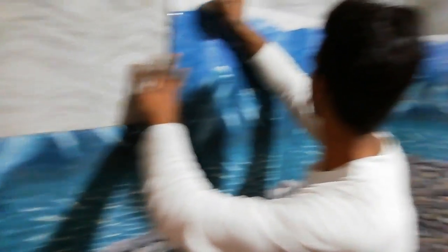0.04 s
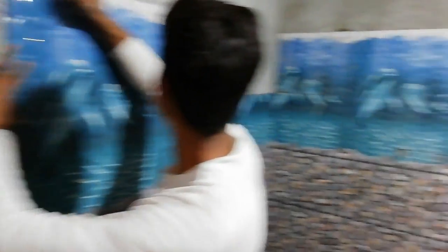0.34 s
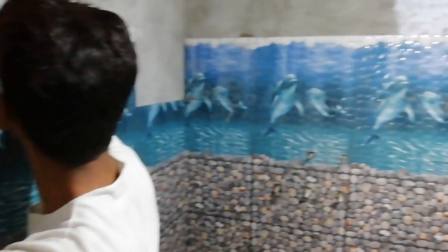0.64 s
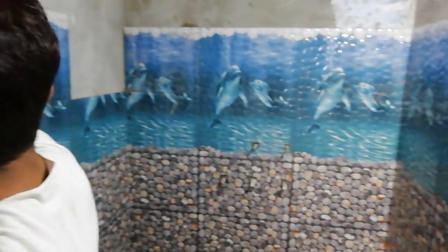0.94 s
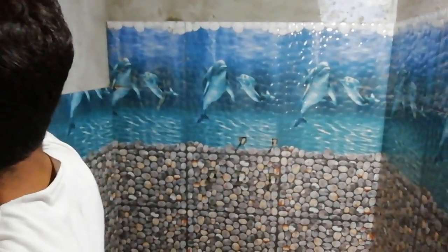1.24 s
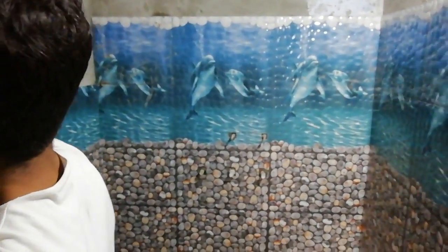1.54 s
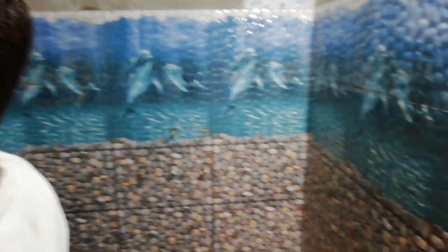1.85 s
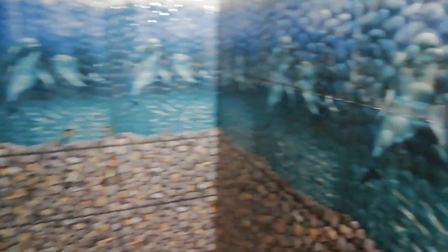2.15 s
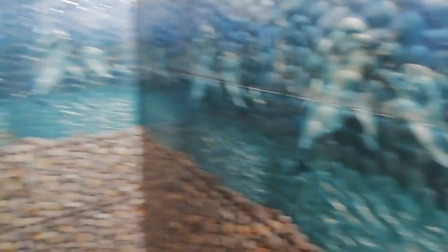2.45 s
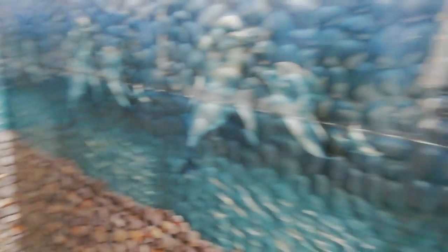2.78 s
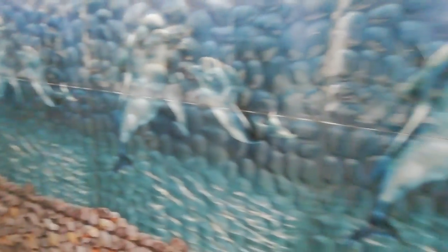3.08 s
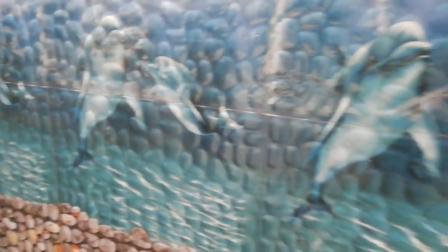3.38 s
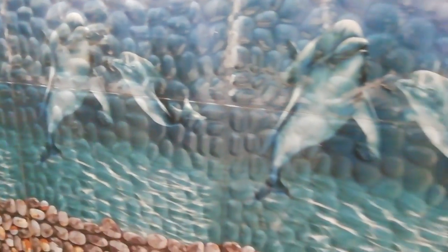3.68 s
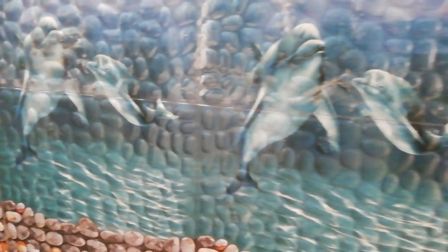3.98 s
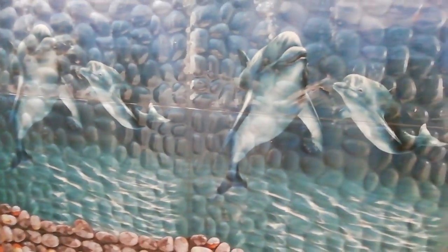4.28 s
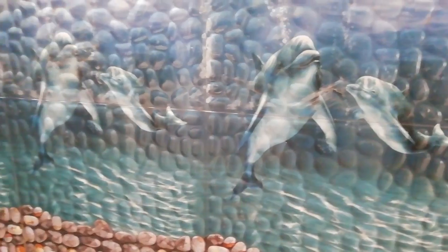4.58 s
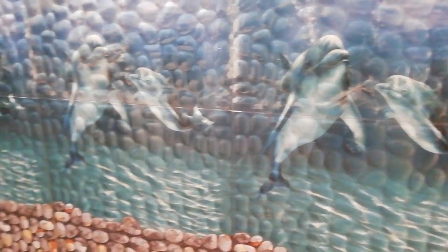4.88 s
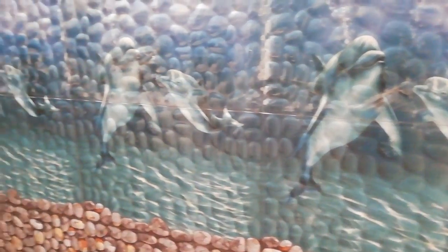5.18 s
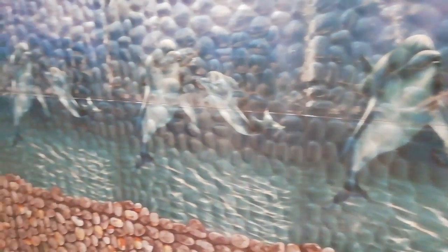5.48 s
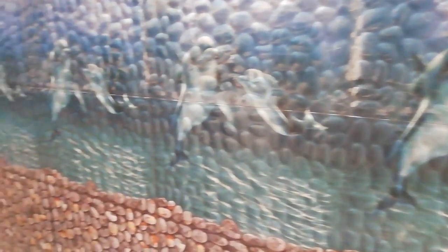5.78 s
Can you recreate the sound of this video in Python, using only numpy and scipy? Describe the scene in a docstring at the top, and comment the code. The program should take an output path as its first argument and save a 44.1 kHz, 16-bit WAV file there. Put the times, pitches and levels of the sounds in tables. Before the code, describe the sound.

A hand thumps a ceramic wall tile several times in a small booming bathroom, followed by light scuffs, ticks and gritty scrapes.

```python
"""A hand thumps a ceramic wall tile into its adhesive in a small bare bathroom.
Each blow slaps the glaze, rings the tile briefly and sets the room's standing waves booming.
Then come a few scuffs, one softer thud and two long scrapes; scuffs and scrapes are sand grains
catching under pressure. Tools and grit tick here and there over quiet room air and a brief faint hum.
Two close microphone ports pick it all up, each with its own colour."""
import sys
import numpy as np
from scipy import signal
from scipy.fft import rfft, irfft, next_fast_len
from scipy.io import wavfile

SR = 44100
rng = np.random.default_rng(int(sys.argv[2]) if len(sys.argv) > 2 else 0)


def generate_wav(signal):
    """Clip the signal to [-1, 1] and save it as 16-bit WAV at the path in sys.argv[1]."""
    frames = np.transpose(np.atleast_2d(signal))
    scaled = np.clip(frames, -1, 1) * 32767
    pcm = np.round(scaled).astype(np.int16)
    wavfile.write(sys.argv[1], SR, pcm)


N = 265922
T = np.arange(N) / SR

# tone of the room air (f/Hz, level/dB)
AIR_EQ = [(20, 9.5), (90, 16.5), (170, 11.5), (300, 6), (550, 1.5), (1500, 4), (3000, 4.5), (5000, -0.5),
          (9000, -1), (15000, 0.5)]
# the air lifts for a while around the blows (t/s, length/s)
AIR_LIFTS = [(-.3, 1.6), (3.235, 1.2)]
# small hard contacts (t/s, level/dB, f/Hz, width/Hz)
TICK_HITS = [(0.556, -17, 8300, 5130), (1.233, -36, 7700, 3000), (1.68, -31, 4000, 7000),
             (2.127, -14.5, 2036, 1000), (2.305, -31, 1010, 596), (4.394, -28.5, 1930, 2600),
             (4.797, -26.5, 2260, 5000), (4.846, -21, 3260, 6100), (4.986, -17.5, 2800, 4230),
             (5.280, -24, 2700, 3680), (5.698, -30.5, 8600, 8000), (5.888, -26, 2240, 910)]
# short slides (t/s, level/dB, swell/s, fade/s, tilt/dB per octave)
SCUFF_SLIDES = [(1.676, -46.5, 0.014, 0.074, 6), (1.754, -38, 0.0077, 0.01, 4),
                (2.091, -35.5, 0.012, 0.013, -2.5), (2.117, -39, 0.0028, 0.038, 3),
                (2.265, -46.5, 0.025, 0.037, 4.5), (2.645, -30.5, 0.043, 0.038, 3),
                (2.85, -46, 0.024, 0.023, -0.5), (3.752, -59.5, 0.029, 0.35, 2.5),
                (5.525, -53.5, 0.02, 0.037, 4.5)]
# tone of a scuff (f/Hz, level/dB)
SCUFF_EQ = [(120, -9), (350, -16.5), (650, -14.5), (1000, -5), (2200, -2), (4000, -8.5), (8000, -15.5),
            (15000, -25.5)]
# long scraping strokes
# (t/s, length/s, hardest at/s, level/dB, easing at the ends/dB, rasp trim/dB, tilt/dB per octave)
SCRAPE_STROKES = [(3.929, 0.32, 4.159, -36.5, 5, -27.5, 1.07), (4.775, 0.5, 5.039, -36, 19, -22, -0.4)]
# tone of a scrape's hiss (f/Hz, level/dB)
SCRAPE_EQ = [(600, -28.5), (1150, -17.5), (1500, -1.5), (2800, 2.5), (4500, 0), (8000, 0), (15000, -9.5)]
# blows of the hand; the first is already dying away at the start (t/s, push/dB, push bandwidth/Hz,
# distance from the corner/m, slap/dB, slap tilt/dB per octave, palm landing/s, favoured f/Hz, ring/dB)
BLOWS = [(-0.105, 1, 330, 0.028, 8.5, 2, 0.002, 1390, -18),
         (0.234, -0.5, 276, 0.071, -2, 0.2, 0.0012, 1350, -2),
         (0.585, -0.5, 330, 0.022, 3.5, 1, 0.018, 3800, 1.5),
         (0.9251, -1, 320, 0.016, -2.5, 0.5, 0.0059, 2260, -10.5),
         (3.291, -9, 140, 0.095, -20.5, -1, 0.0061, 1420, -20)]
# tone of the palm on the glaze (f/Hz, level/dB)
SLAP_EQ = [(120, -5), (300, 1.5), (450, -4.5), (620, -2), (900, -3.5), (1600, 0), (2600, 0), (4500, -5.5),
           (6200, -7.5), (8000, -8.5), (15000, -3)]
# modes of the bedded tile (f/Hz, level/dB, t60/s)
TILE_PARTIALS = [(1290, -10, 0.24), (1362, 5, 0.044), (1670, -26, .04), (2220, 8, 0.18), (2540, -34, 0.06),
                 (3830, 3, 0.027), (5150, -9, 0.02), (6520, 17.5, 0.018)]
# standing waves between the walls (f/Hz, level/dB, t60/s)
ROOM_MODES = [(25.5, -15, 4.0), (26.8, -8, 3.8), (48.8, 0, 1.8), (72.3, -9, 2.2), (79.5, -5, 1.6),
              (87.5, -5, 2.0), (97.1, -9, 1.5), (102.2, -11, 1.4), (105.4, -13, 1.4), (116.2, -15, 1.1),
              (137.8, -8, 1.5), (146, -14, .9), (154.3, -10, 1.1), (160, -10, 1.0), (166, -9, 1.3),
              (181, -8, .9), (194.4, -9, .8), (204.5, -8, 1.0), (213.4, -8, .8), (224.6, -9, .9),
              (236.6, -11, .9), (245.1, -15, 1.0), (260, -15, .7), (271, -16, .6), (334.3, -23, .6),
              (351, -20, .55)]
# reverb time of the tiled room (f/Hz, t60/s)
REVERB_DECAY = [(250, 0.84), (800, 0.36), (2000, 0.36), (5500, .3), (14000, 0.17)]
# colour of the two microphone ports (f/Hz, left level/dB, right level/dB)
PORT_EQ = [(250, 2.5, 2.5), (1115, -2.5, 2.5), (4600, -6.5, -6), (5410, -6.5, -2), (6380, -8, 4.5),
           (7280, -12.5, -2.5), (7470, -18, -8.5), (9340, -12, -13.5), (9960, -8.5, -8.5),
           (12300, -8.5, -11.5), (15900, -5.5, -13.5)]


def undb(db):
    """Decibels to gain."""
    return 10 ** (np.asarray(db) / 20)


def unit(x):
    """Scale to rms 1."""
    return x / np.sqrt(np.mean(x ** 2))


def fade(t, t60):
    """Exponential decay, 60 dB down after t60."""
    return np.exp(-np.log(1000) * t / t60)


def envelope(t, attack_s, held_s, release_s):
    """Rise from time 0, hold until held_s, then die away."""
    return np.clip(t / attack_s, 0, 1) * np.exp(-np.maximum(t - held_s, 0) / release_s)


def add(track, at_s, sound):
    """Mix a sound in, keeping the part that falls inside the track."""
    start = int(round(at_s * SR))
    part = sound[..., max(-start, 0):N - start]
    track[..., max(start, 0):max(start, 0) + part.shape[-1]] += part


def on_log_axis(hz, points):
    """Read (Hz, value) points on a logarithmic frequency axis."""
    f, value = np.transpose(points)
    return np.interp(np.log(np.maximum(hz, 1)), np.log(f), value)


def equalise(x, points, tilt_db=0):
    """Minimum-phase EQ through (Hz, dB) points, tilted by tilt_db per octave about 2 kHz."""
    size = 2 * next_fast_len(x.shape[-1])
    hz = np.maximum(np.fft.rfftfreq(size, 1 / SR), 20)
    db = on_log_axis(hz, points) + tilt_db * np.log2(np.maximum(hz, 300) / 2000)
    cepstrum = irfft(np.log(undb(db)))
    cepstrum[1:size // 2] *= 2  # folded forward, so nothing rings ahead of an attack
    cepstrum[size // 2 + 1:] = 0
    return irfft(rfft(x, size) * np.exp(rfft(cepstrum)))[..., :x.shape[-1]]


def resonate(x, hz, width_hz):
    """A resonance applied twice for steep skirts, gain 1 at its centre."""
    b, a = signal.iirpeak(hz, hz / width_hz, fs=SR)
    return signal.lfilter(b, a, signal.lfilter(b, a, x))


def stereo_noise(size, shared_hz=450):
    """Noise at two close ports: alike in the bass, unrelated in the treble."""
    mid, side = rfft(rng.standard_normal((2, size)))
    alike = 1 / (1 + (np.fft.rfftfreq(size, 1 / SR) / shared_hz) ** 2)
    mid *= np.sqrt(1 + alike)
    side *= np.sqrt(1 - alike)
    return irfft(np.array([mid + side, mid - side]) / np.sqrt(2), size)


def contact(shape):
    """A short burst of noise with an even spectrum and no ring of its own."""
    spectrum = rfft(rng.standard_normal(len(shape)) * shape)
    even = irfft(spectrum / (np.abs(spectrum) + 1e-18), len(shape))
    return unit(even * np.sqrt(shape))


def grit(size, spread_db):
    """Dense micro-impacts of sand grains, a few much larger than the rest."""
    grains = rng.standard_normal(size)
    grain_db = spread_db * np.minimum(rng.exponential(size=size), 6)
    return unit(grains * undb(grain_db))


def in_room(x, direct=0.39, build_s=0.00022):
    """Direct sound, then dense reflections off the tiles, new for each spot; the treble dies first."""
    t = T[:int(0.8 * SR)]
    noise, hz = rfft(stereo_noise(len(t))), np.fft.rfftfreq(len(t), 1 / SR)
    centres, t60s = np.transpose(REVERB_DECAY)
    bands = [on_log_axis(hz, np.c_[centres, share]) for share in np.eye(len(centres))]
    tail = sum(irfft(noise * band, len(t)) * fade(t, t60) for band, t60 in zip(bands, t60s))
    response = unit(tail * (1 - np.exp(-t / build_s))) / np.sqrt(len(t))
    response[:, 0] += direct
    return signal.fftconvolve(x[None], response, axes=1)[:, :len(x)]


def room_air(level_db=-62, lift_db=6, rise_s=0.25, settle_s=0.85):
    """A quiet bed of air that swells a little around the blows."""
    lift = sum(envelope(T - at_s, rise_s, length_s, settle_s) for at_s, length_s in AIR_LIFTS)
    return unit(equalise(stereo_noise(N), AIR_EQ)) * undb(level_db + lift_db * lift)


def hum(level_db=-71, start_s=4.37):
    """A faint wavering hum of narrow-band noise that comes and goes once."""
    tone = unit(resonate(rng.standard_normal(N), hz=535, width_hz=33))
    return undb(level_db) * tone * envelope(T - start_s, attack_s=0.074, held_s=0.23, release_s=0.28)


def ticks(base_db=-38, contact_t60=0.0069):
    """Light knocks of tools and grit, each with one short resonance."""
    out, t = np.zeros((2, N)), T[:SR // 2]
    for at_s, db, hz, width_hz in TICK_HITS:
        knock = resonate(contact(fade(t, contact_t60)), hz, width_hz)
        add(out, at_s, in_room(undb(base_db + db) * unit(knock)))
    return out


def scuffs(spread_db=3):
    """Brief slides over gritty cement: each swells, then fades."""
    out, t = np.zeros((2, N)), T[:SR]
    for at_s, db, swell_s, fade_s, tilt_db in SCUFF_SLIDES:
        pressure = envelope(t, swell_s, swell_s, fade_s)
        friction = unit(equalise(grit(len(t), spread_db), SCUFF_EQ, tilt_db))
        add(out, at_s, in_room(undb(db) * pressure * friction))
    return out


def scrapes(spread_db=4, judder_db=3.5, judder_hz=90, rasp_db=-2, bite_s=0.025, lift_off_s=0.04):
    """Trowel-like strokes over sandy mortar: a juddering hiss with a lower rasp under it."""
    out, t = np.zeros((2, N)), T[:SR]
    knots = np.arange(0, 2, 1 / judder_hz)
    for at_s, length_s, hardest_s, db, ease_db, rasp_trim_db, tilt_db in SCRAPE_STROKES:
        judder = np.interp(t, knots, rng.standard_normal(len(t))[:len(knots)])
        grip = undb(judder_db * judder)
        hiss = unit(in_room(equalise(grip * grit(len(t), spread_db), SCRAPE_EQ, tilt_db)))
        rasp = unit(in_room(resonate(grip * grit(len(t), spread_db), hz=1270, width_hz=1300)))
        arch_db = -ease_db * (2 * (at_s + t - hardest_s) / length_s) ** 2  # leans in, then eases
        pressure = undb(db + arch_db) * envelope(t, bite_s, length_s, lift_off_s)
        add(out, at_s, pressure * (hiss + undb(rasp_db + rasp_trim_db) * rasp))
    return out


def standing_waves(build_s=0.0064, step_turns=0.41, port_lag_s=0.00018):
    """The ring of every standing wave at both ports after one push."""
    t = T[:4 * SR]
    waves, swell = [], 1 - np.exp(-(t / build_s) ** 2)
    for k, (hz, db, t60) in enumerate(ROOM_MODES):
        lag_s = (-1) ** k * port_lag_s * np.array([[1], [-1]])  # waves arrive from alternate sides
        # each wave trails its lower neighbour, so the boom blooms after the slap
        turns = hz * (t + lag_s) - k * step_turns
        waves.append(-undb(db) * swell * fade(t, t60) * np.sin(2 * np.pi * turns))
    return np.array(waves)


def boom(waves, push_hz, corner_m):
    """A softer push reaches only the lowest waves, and misses those with a node at the struck spot."""
    hz = np.transpose(ROOM_MODES)[0]
    coupling = np.cos(2 * np.pi * hz * corner_m / 343)  # sound travels at 343 m/s
    rolloff = 1 / (1 + (hz / push_hz) ** 3)
    return np.tensordot(coupling * rolloff, waves, 1)


def tile_ring(t, favoured_hz, spread_octaves=0.38, floor=0.091):
    """The short ring of the bedded tile; the spot that is struck favours some of its modes."""
    ring = np.zeros(len(t))
    for hz, db, t60 in TILE_PARTIALS:
        drive = floor + np.exp(-(np.log2(hz / favoured_hz) / spread_octaves) ** 2)
        ring += undb(db) * drive * np.sin(2 * np.pi * hz * t) * fade(t, t60)
    return ring


def thumps(boom_db=-23, glaze_db=-39, slap_t60=0.037, tile_db=-31, ring_send_db=-9):
    """The palm slaps the glaze, the tile rings briefly, the wall drives the room."""
    out, t, waves = np.zeros((2, N)), T[:SR], standing_waves()
    for at_s, push_db, push_hz, corner_m, slap_db, tilt_db, land_s, favoured_hz, ring_db in BLOWS:
        palm = contact((1 - np.exp(-t / land_s)) * fade(t, slap_t60))
        slap = undb(glaze_db + slap_db) * unit(equalise(palm, SLAP_EQ, tilt_db))
        ring = undb(tile_db + ring_db) * tile_ring(t, favoured_hz)
        add(out, at_s, ring + in_room(slap + undb(ring_send_db) * ring))
        add(out, at_s, undb(boom_db + push_db) * boom(waves, push_hz, corner_m))
    return out


def scene():
    """Thumps up front, small work noises behind them, air and hum underneath."""
    return thumps() + scuffs() + scrapes() + ticks() + room_air() + hum()


def record(dry, top_hz=15700):
    """Each port colours its channel; the top end is cut steeply."""
    hz, left_db, right_db = np.transpose(PORT_EQ)
    left = equalise(dry[0], np.c_[hz, left_db])
    right = equalise(dry[1], np.c_[hz, right_db])
    high_cut = signal.ellip(8, 0.1, 60, top_hz, fs=SR, output="sos")
    return signal.sosfiltfilt(high_cut, np.array([left, right]))


dry = scene()
out = record(dry)
generate_wav(out)
```